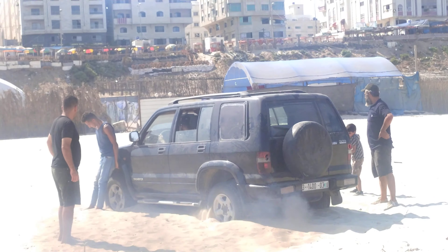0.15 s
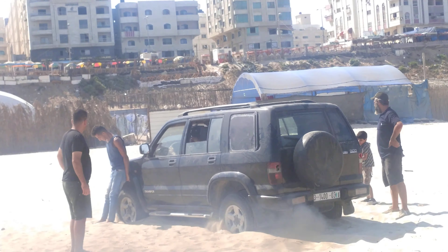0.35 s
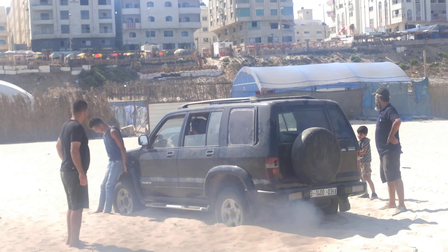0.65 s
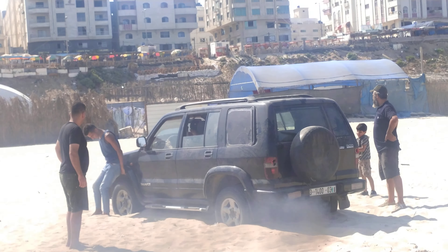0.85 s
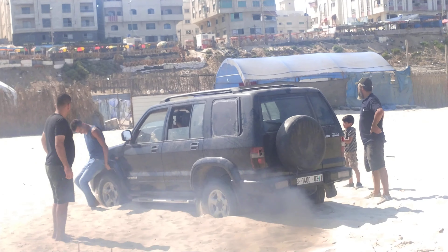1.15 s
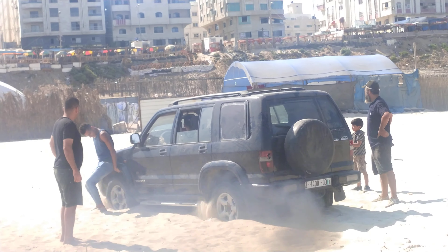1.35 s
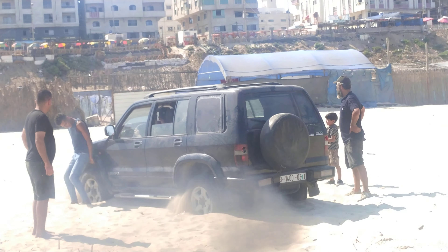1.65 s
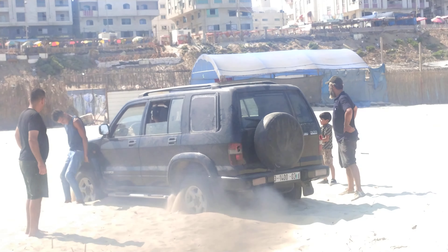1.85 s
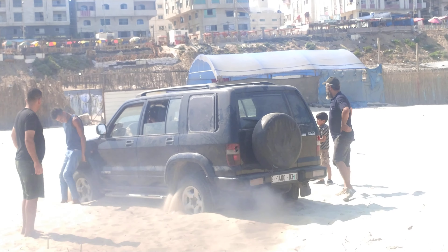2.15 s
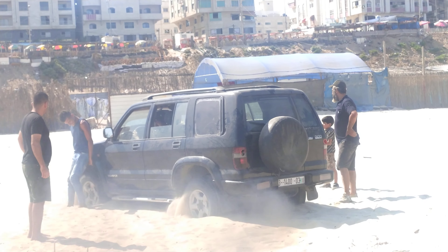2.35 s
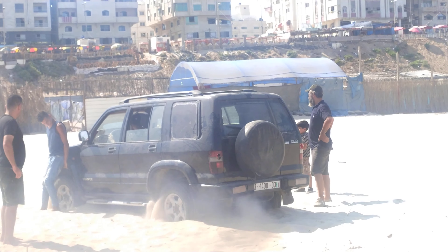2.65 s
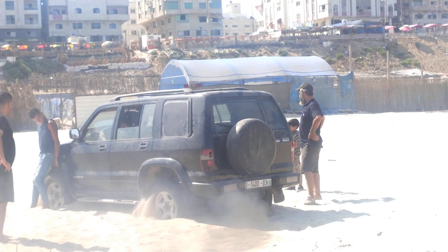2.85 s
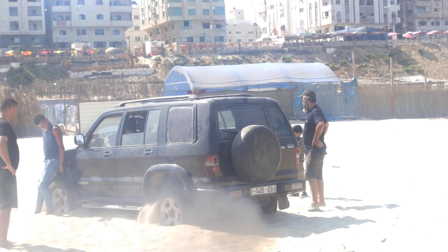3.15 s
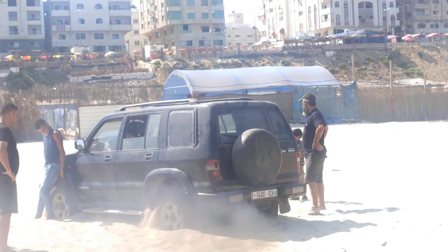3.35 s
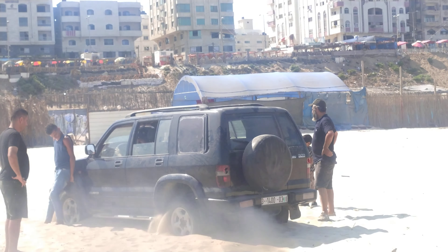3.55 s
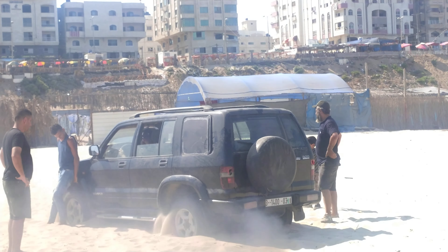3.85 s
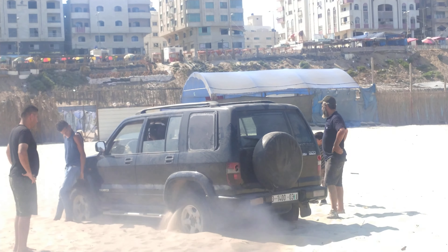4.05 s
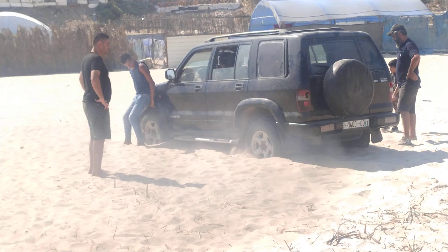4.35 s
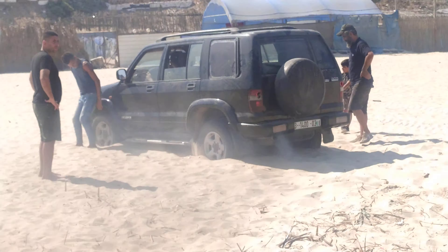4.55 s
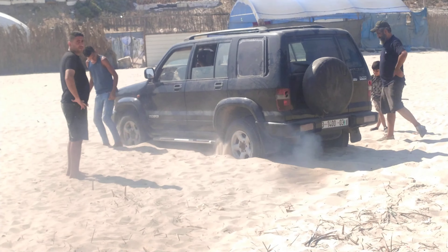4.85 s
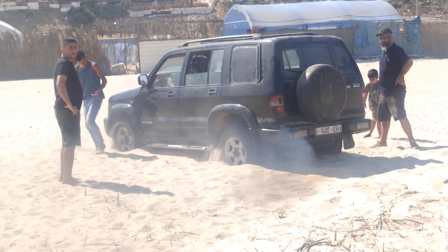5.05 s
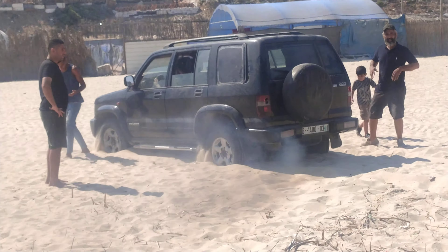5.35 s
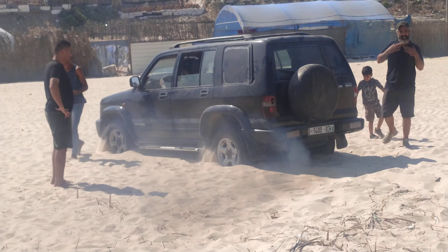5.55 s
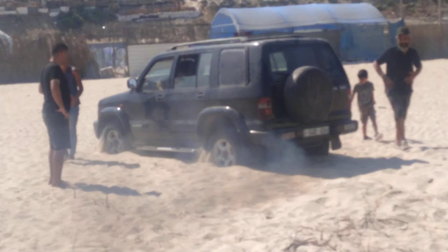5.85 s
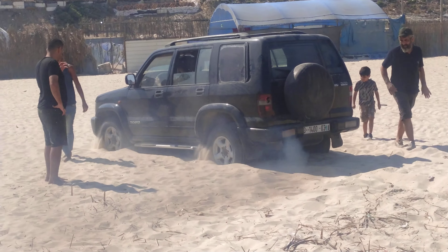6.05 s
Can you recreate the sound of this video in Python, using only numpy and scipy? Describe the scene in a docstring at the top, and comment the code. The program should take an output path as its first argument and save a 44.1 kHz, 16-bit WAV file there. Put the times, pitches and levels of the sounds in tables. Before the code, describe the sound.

Outdoors on a beach, wind rumbles and thumps against the microphone, mainly from the right. Through it, an off-roader's engine climbs in pitch and strains steadily, with a low exhaust drone, fan roar and light metal rattle, as sand hisses off a spinning tyre. After about four seconds the engine settles to lower revs and keeps running, while the gusts hit hardest.

```python
"""Off-roader stuck on a beach

A four-cylinder engine revs up, spins a wheel in soft sand and eases off. Its firings drive an exhaust
drone and the clatter of block and covers, joined by a roaring fan and a thin gear whine. Thrown sand
hisses and ticks, and gusts of wind buffet the microphone, mostly its right port."""
import sys
import numpy as np
from scipy import signal
from scipy.fft import rfft, irfft
from scipy.io import wavfile
from scipy.ndimage import uniform_filter1d

SR = 44100
rng = np.random.default_rng(int(sys.argv[2]) if len(sys.argv) > 2 else 0)


def log_audio(samples):
    """Write samples as a 16-bit WAV file to the path given in sys.argv[1]."""
    # one column per channel
    frames = np.atleast_2d(samples).T
    # limit to full scale, then quantise
    limited = np.clip(frames, -1, 1)
    pcm = np.round(limited * 32767).astype(np.int16)
    wavfile.write(sys.argv[1], SR, pcm)


N = 272979
TIME, FREQ = np.arange(N) / SR, np.fft.rfftfreq(N, 1 / SR)


def amp(db):
    """Decibels to gain."""
    return 10 ** (np.asarray(db) / 20)


def panned(db, pan_db):
    """Left and right gains, the left pan_db above the right."""
    return amp([[db + pan_db / 2], [db - pan_db / 2]])


def unit_rms(x):
    """Scales to an rms of one."""
    return x / np.sqrt(np.mean(x ** 2) + 1e-20)


def curve(rows):
    """A control, joined by straight lines in time."""
    return np.interp(TIME, *np.transpose(rows))


def spectrum(points):
    """A spectrum, joined by straight lines on a log-frequency axis."""
    hz, value = np.transpose(points)
    return np.interp(np.log(FREQ + 1), np.log(hz), value)


def coloured(x, points):
    """Shapes x with an EQ curve and scales it to an rms of one."""
    return unit_rms(irfft(rfft(x) * amp(spectrum(points)), N))


def wander(rate_hz, count=1):
    """Rows of smooth random drift with an rms of one."""
    noise = rfft(rng.standard_normal((count, N)))
    return unit_rms(irfft(noise * np.exp(-(FREQ / rate_hz) ** 2), N))


def envelope(peak_s, hold_s, attack_s, release_s):
    """Grows exponentially to one at peak_s, holds, then dies away."""
    early, late = np.maximum(peak_s - TIME, 0), np.maximum(TIME - peak_s - hold_s, 0)
    return np.exp(-np.minimum(early / attack_s + late / release_s, 30))


def load_at(firing_hz, eased_hz=70, revved_hz=94):
    """Engine load at a firing rate: 0 eased off, 1 revved."""
    return np.clip((firing_hz - eased_hz) / (revved_hz - eased_hz), 0, 1)


def by_load(load, eased, revved):
    """Crossfades a setting from its eased-off to its revved value."""
    return eased + (revved - eased) * load


def build_up(load, rise_s):
    """Creeps up behind the load, but drops with it at once."""
    keep = np.exp(-1 / (rise_s * SR))
    return np.minimum(load, signal.lfilter([1 - keep], [1, -keep], load))


def port_rolloff(hz):
    """Gain of the microphone port, which loses the very top."""
    return 1 / np.sqrt(1 + (hz / 10500) ** 34)


def stereo(x):
    """Blends two unrelated signals so that the ports agree in the bass and less in the treble."""
    # Likeness of the car's sound at the two ports. Each row: frequency in Hz, likeness from 0 to 1.
    likeness = [(50, 0.9), (300, 1), (650, 1), (1400, 0.96), (2500, 0), (4000, 0.49), (7000, 0),
                (15000, 0.3)]
    same = np.clip(spectrum(likeness), 0, 1)
    left, other = rfft(x)
    return irfft(np.array([left, same * left + np.sqrt(1 - same ** 2) * other]), N)


def narrowed(x, spread, lag_s):
    """Draws a wide sound together into one small source, heard later at the left port."""
    left, right = x.mean(0) + spread * (x - x.mean(0))
    return unit_rms(np.array([np.interp(TIME - lag_s, TIME, left), right]))


def add(mix, start_s, sound):
    """Mixes a sound in at start_s."""
    part = mix[..., max(round(start_s * SR), 0):][..., :sound.shape[-1]]
    part += sound[..., :part.shape[-1]]


def bursts(rows, decay_s, gain_db=0):
    """Dry, dying bursts of noise, each in a band round its pitch."""
    out, t = np.zeros((2, N)), np.arange(-256, 8192) / SR
    freq = np.fft.rfftfreq(len(t), 1 / SR) + 1
    for start_s, db, hz, pan_db, width in rows:
        noise = rng.standard_normal(len(t)) * np.exp(-abs(t) / decay_s) * (t >= 0)
        band = np.exp(-.5 * (np.log(freq / hz) / width) ** 2) * port_rolloff(freq)
        hit = irfft(rfft(noise) * band)
        add(out, start_s + t[0], hit / abs(hit).max() * panned(db + gain_db, pan_db))
    return out


def buffeting(port, breeze, flutter_db=2.1, calm_db=-36, hard_db=-17, lumpy_db=2):
    """Turbulence at one port: a fluttering breeze and sudden gusts, brighter the harder it blows."""
    # Gusts. Each row: arrival in seconds, hold in seconds, level in dB, rumble from 0 to 1, port struck.
    gusts = [(0.042, 0.028, -22, 0.36, "right"), (1.12, 0.012, -19, 0.3, "right"),
             (1.83, 0.008, -20.5, 0, "left"), (1.996, 0.045, -14, 0, "right"),
             (2.07, 0.069, -17.5, 0.3, "right"), (2.585, 0.02, -19.5, 0.46, "right"),
             (2.858, 0.077, -21, 0.68, "right"), (3.217, 0.0045, -12.5, 0.28, "right"),
             (3.476, 0.013, -17.5, 0.2, "right"), (3.629, 0.045, -14.5, 0.4, "right"),
             (3.715, 0.021, -15.5, 0.48, "right"), (3.77, 0.28, -21, 0.25, "right"),
             (4.055, 0.024, -15.5, 0.6, "right"), (4.51, 0.11, -21, 0.9, "right"),
             (4.673, 0.08, -18, 0.39, "right"), (4.796, 0.032, -16.5, 0.82, "right"),
             (4.86, 0.016, -16, 0.34, "right"), (4.907, 0.012, -14, 0.5, "right"),
             (4.989, 0.011, -21, 0.37, "right"), (5.117, 0.036, -16.5, 0.49, "right"),
             (5.201, 0.026, -21, 0.67, "right"), (5.611, 0.02, -22, 0, "left"),
             (5.688, 0.041, -18.5, 0.37, "right")]
    # Tone of a breeze and of a hard gust. Each row: frequency in Hz, relative level in dB.
    breeze_eq = [(10, 19.5), (28, 10), (60, 11), (140, 5), (220, 2.5), (350, -25), (600, -21),
                 (1200, -37.5), (3000, -79)]
    gale_eq = [(10, 12.5), (30, -17), (80, -8), (170, 4), (300, 2.5), (450, -4.5), (700, -16), (900, -22),
               (1200, -26.5), (2000, -55), (4000, -85)]
    level = amp(curve(breeze) + flutter_db * wander(11)[0])
    rumble = np.zeros(N)
    for peak_s, hold_s, db, share, struck in gusts:
        if struck == port:
            gust = envelope(peak_s, hold_s, attack_s=0.024, release_s=0.017)
            level = np.maximum(level, amp(db) * gust)
            rumble = np.maximum(rumble, share * gust)
    force = np.clip((20 * np.log10(level) - calm_db) / (hard_db - calm_db), 0, 1)
    brightness = force * (1 - np.minimum(rumble, 1))
    eddies = rng.standard_normal(N) * amp(lumpy_db * wander(107)[0])
    buffet = (1 - brightness) * coloured(eddies, breeze_eq) + brightness * coloured(eddies, gale_eq)
    running_rms = np.sqrt(uniform_filter1d(buffet ** 2, 2600))
    return level * buffet / running_rms


def eddy_slaps(trim_db=-1):
    """An eddy pushes on the port and sucks back: one smooth swing of pressure."""
    # Single eddies. Each row: time in seconds, peak in dB before the trim, centre in Hz.
    slaps = [(1.128, -8.5, 164), (2.007, -4.5, 318), (2.128, -5.5, 362), (2.593, -26, 260),
             (3.712, -7.5, 316), (3.998, -15.5, 428), (4.67, -10, 298), (4.677, -10.5, 376),
             (4.721, -16.5, 330), (4.817, -4, 180), (4.853, -7, 221), (4.8629, -7, 238), (4.8703, -6, 258),
             (4.876, -14, 370), (4.9046, -3, 280), (4.9048, -10.5, 660), (4.9115, -8.5, 480),
             (4.922, -9, 240), (5.713, -20, 151)]
    out = np.zeros(N)
    for at_s, db, hz in slaps:
        angle = 2 * np.pi * hz * (TIME - at_s)
        swing = angle * np.exp(-.5 * np.minimum(angle ** 2, 100))
        out -= amp(db + trim_db) * swing / swing.max()
    return out


def wind():
    """Wind strikes each port on its own; the hardest slap on the right tears into a turbulent wake."""
    # Breeze at the sheltered left and exposed right port. Each row: time in seconds, level in dB.
    breeze_left = [(0, -43), (1.55, -53), (1.75, -32), (1.9, -30), (2.15, -38), (2.35, -54), (3.7, -47),
                   (5.4, -38), (5.65, -31.5), (5.9, -49), (6.19, -36)]
    breeze_right = [(0, -31.5), (.38, -28), (.6, -44), (1.0, -37), (1.65, -28), (1.88, -33), (2.1, -30),
                    (2.35, -41), (2.55, -24.5), (3.2, -32), (3.36, -32.5), (3.55, -25.5), (3.9, -29.5),
                    (6.19, -32.5)]
    # The wake. Each row: start in seconds, mid peak in dB, left over right in dB, pitch-relative width,
    # with the pitch in Hz in third place.
    wakes = [(4.907, -28, 980, -30, 0.33)]
    wake = bursts(wakes, decay_s=0.008)
    left = buffeting("left", breeze_left)
    right = buffeting("right", breeze_right) + eddy_slaps()
    return np.array([left, right]) + wake


def scuffs():
    """Rough swells of noise, each in its own band, as the car shifts in its rut; the long narrow one at 4.15 s
    is a cover rattling."""
    # Scrapes. Each row: start in seconds, level in dB, length in seconds, centre in Hz,
    # width in octaves, left over right in dB.
    scrapes = [(0.0, -45.5, 0.31, 1870, 0.3, 6), (0.773, -41.5, 0.055, 1130, 0.19, 0),
               (1.81, -52, 0.085, 6500, 0.95, -1), (4.15, -59, 0.76, 2820, 0.045, -7),
               (4.224, -45.5, 0.068, 1250, 0.72, -12), (4.226, -51.5, 0.061, 8600, 0.54, -1),
               (4.257, -48, 0.0095, 9900, 0.16, 4), (4.313, -49, 0.019, 9300, 0.34, 1)]
    out, noise = np.zeros((2, N)), rfft(stereo(rng.standard_normal((2, N))))
    for start_s, db, length_s, hz, octaves, pan_db in scrapes:
        band = np.exp(-.5 * (np.log2((FREQ + 1) / hz) / octaves) ** 2) * port_rolloff(FREQ)
        progress = np.clip((TIME - start_s) / length_s, 0, 1)
        swell = np.sqrt(abs(np.sin(np.pi * progress)))
        out += unit_rms(irfft(noise * band, N)) * swell * panned(db, pan_db)
    return out


def impacts():
    """Sharp ticks of grit and dull knocks from the car."""
    # Ticks and knocks. Each row: start in seconds, relative peak in dB, pitch in Hz,
    # left over right in dB, bandwidth relative to the pitch.
    ticks = [(0.3336, -35, 9040, 11, 0.27), (0.6854, -33, 9320, 0.5, 0.5), (1.001, -33.5, 8500, 0, 0.76),
             (1.1948, -18.5, 7400, 8, 0.3), (1.823, -36.5, 8500, 8, .22), (1.8504, -33, 7800, 13, 0.2),
             (1.872, -36, 9000, 8, .2), (2.2337, -31, 10300, 2.5, 0.14), (2.3762, -31.5, 9300, 0.5, 0.16),
             (3.292, -33, 9440, -0.5, 0.15), (5.785, -39, 9000, 0, 0.2)]
    knocks = [(.788, -28, 1000, -2, 0.25), (1.438, -24, 840, 3, 0.48), (4.238, -26.5, 950, -1, 0.16)]
    return bursts(ticks, decay_s=0.0007) + bursts(knocks, decay_s=0.008, gain_db=-4.5)


def grain_stream(eq, grain_db=0.5, flutter_db=0.7, grains_per_s=9000):
    """A stream of tiny grain impacts of uneven size, thrown in clumps."""
    sizes = amp(grain_db * np.minimum(rng.exponential(1, (2, N)), 5)) * rng.standard_normal((2, N))
    grains = sizes * (rng.random((2, N)) < grains_per_s / SR)
    return coloured(stereo(grains), eq) * amp(flutter_db * wander(22))


def thrown_sand(load):
    """The tyre breaks loose in a broad spray; as it digs in, the hiss grows and coarse grit flies."""
    # Tone of the grit, the hiss and the spray. Each row: frequency in Hz, relative level in dB.
    coarse_eq = [(3000, -38), (4300, -12), (4800, 3), (5600, 4), (6100, -19), (8000, -40)]
    hiss_eq = [(2000, 1), (3500, 5.5), (3950, 5.5), (4550, -1), (5400, -2), (6000, -5), (6500, 1.5),
               (7100, -1.5), (8400, 4), (9200, 8), (10200, 0.5), (11000, -6), (12200, -22), (12900, -15),
               (14000, -20), (15500, -38)]
    spray_eq = [(1500, -2.5), (3300, -5.5), (3950, -6), (4450, -6), (5400, -3), (6100, -6), (7000, -4.5),
                (8000, -5), (9400, -2.5), (10200, -1.5), (11100, -8.5), (12000, -7.5), (14100, -14),
                (14900, -34)]
    slip = build_up(load ** 2.8, rise_s=0.15)
    coarse = grain_stream(coarse_eq, grain_db=4.0, flutter_db=3.1) * amp(-60.5) * slip
    hiss = grain_stream(hiss_eq) * amp(by_load(slip, eased=-51.5, revved=-48.5))
    breakaway = envelope(peak_s=0.69, hold_s=0.049, attack_s=0.68, release_s=0.12)
    spray = grain_stream(spray_eq) * amp(-42.5) * breakaway
    return hiss + coarse + spray


def gear_whine(firings, waver_db=2):
    """The timing gear meshes 25 times a firing; backlash roughens its tone."""
    # Swells of the whine. Each row: time in seconds, level in dB.
    swells = [(0, -70), (.8, -68), (.95, -56.5), (1.3, -58), (1.5, -67), (2.75, -66), (3.0, -58),
              (3.58, -57), (3.85, -70), (4.15, -66), (4.55, -55.5), (5.0, -57), (5.25, -61.5), (6.19, -62)]
    mesh = np.sqrt(2) * np.sin(2 * np.pi * 25 * firings + .6 * wander(50))
    return mesh * amp(curve(swells) + waver_db * wander(5.2))


def clatter(firings, eq, ring_s, knock_share, lope, uneven_db, cylinders=4):
    """Each cylinder knocks the metal with its own ring; a rattle of noise lopes once per engine cycle."""
    fired = np.flatnonzero(np.diff(np.floor(firings)))
    t = np.arange(4096) / SR
    knocks = np.zeros((2, N))
    for cylinder in range(cylinders):
        blows, at = np.zeros((1, N)), fired[cylinder::cylinders]
        blows[0, at] = amp(uneven_db * rng.standard_normal(len(at)))
        ring = rng.standard_normal((2, len(t))) * np.exp(-t / ring_s)
        knocks += signal.oaconvolve(blows, ring, axes=1)[:, :N]
    pulse = 1 + lope * np.exp(-cylinders * (firings / cylinders % 1))
    rattle = rng.standard_normal((2, N)) * pulse * amp(uneven_db * wander(67)[0])
    blend = np.sqrt(knock_share) * unit_rms(knocks) + np.sqrt(1 - knock_share) * unit_rms(rattle)
    return coloured(stereo(blend), eq)


def loose_cover(ring_hz=2590, stray_hz=45, width_hz=110):
    """A rough, fuzzy ring whose pitch strays as the cover shifts."""
    angle = 2 * np.pi * np.cumsum(ring_hz + stray_hz * wander(5.0)[0]) / SR
    fuzz = wander(width_hz, count=2)
    return fuzz[0] * np.cos(angle) + fuzz[1] * np.sin(angle)


def cover_rattle(firings, rasp_s=0.035):
    """Thin metal covers rattle with the firings, and a loose one buzzes among them."""
    # Ring of the covers. Each row: frequency in Hz, relative level in dB.
    cover_eq = [(1300, -11.5), (2200, -5), (2420, 6.5), (2560, 2.5), (2690, 0), (2820, -3.5), (3050, -5),
                (3500, -25), (3950, -9.5), (4500, -45), (8000, -42)]
    # The rattle dips as the revs fall and again near the end. Each row: time in seconds, level in dB.
    levels = [(0, -59.5), (.4, -48.5), (3.5, -47.5), (3.95, -55.5), (4.35, -50.5), (4.8, -47), (5.15, -60),
              (6.19, -54)]
    # Brief harder rasps. Each row: time in seconds, boost in dB.
    rasps = [(.68, 1), (1.0, 4), (1.6, 5), (2.03, 1.5), (3.06, 3), (4.27, 6)]
    rattle = clatter(firings, cover_eq, ring_s=0.028, knock_share=0.63, lope=0.44, uneven_db=2.5)
    covers = narrowed(rattle + amp(-8.5) * loose_cover(), spread=0.26, lag_s=0.00035)
    rasp_db = sum(db * np.exp(-((TIME - at_s) / rasp_s) ** 2) for at_s, db in rasps)
    return covers * amp(curve(levels) + rasp_db)


def block_clatter(firings, load):
    """Combustion knocks ring through the engine block."""
    # Ring of the block. Each row: frequency in Hz, relative level in dB.
    block_eq = [(400, 2), (760, -12.5), (860, 1), (960, 0), (1200, -0.5), (1310, -7.5), (1420, -5.5),
                (1530, -6), (1720, -5), (1880, -8), (2030, -10.5), (2600, -10), (3500, -24.5), (5000, -22),
                (8000, -58)]
    block = clatter(firings, block_eq, ring_s=0.033, knock_share=0.36, lope=0.34, uneven_db=1.04)
    return block * amp(by_load(load, eased=-41.5, revved=-41))


def block_singing(firings, load, waver_db=4.0, jitter_rad=0.3):
    """The straining block sings upper partials that waver in strength and phase; the steady line at 10.33 times
    the firing rate is the tone of an accessory such as the alternator or pump."""
    # Partials. Each row: multiple of the firing rate, relative level in dB eased off, then revved.
    partials = [(9, -80, -59.5), (9.5, -80, -59), (10, -80, -62), (10.33, -78, -56), (11, -76, -60.5),
                (11.5, -72, -62), (12, -67, -60), (12.5, -66, -63), (12.75, -67, -61.5), (13, -59.5, -63),
                (13.5, -59.5, -67), (14, -64, -66), (15, -67, -65), (16, -64, -68), (17.75, -63, -70),
                (18, -62, -68)]
    out = np.zeros(N)
    for multiple, eased_db, revved_db in partials:
        swell, drift = wander(10.5, count=2)
        level_db = by_load(load, eased_db, revved_db) + waver_db * swell
        out += amp(level_db) * np.cos(2 * np.pi * (multiple * firings + rng.random()) + jitter_rad * drift)
    return out


def fan(firings, load, throb=0.25, waver_db=4.0):
    """The cooling fan: a roar of air that throbs with the firings, and wavering blade tones."""
    # The fan trails the engine on its slipping clutch.
    # Each row: time in seconds, blade rate in Hz, boost of the tones in dB.
    speeds = [(0, 405, -3), (.35, 388, -4), (.5, 402, 0), (.72, 455, -1), (.8, 463, -1), (.92, 443, -3),
              (1.15, 424, -1), (2.6, 429, -1), (3.65, 428, -1), (3.9, 411, 4), (4.1, 383, -3),
              (4.27, 369, 4), (4.55, 363, -1), (6.19, 362, 0)]
    # Blade tones. Each row: multiple of the blade rate, relative level in dB.
    blade_tones = [(.895, -69), (1, -45), (1.066, -49.5)]
    # Roar of fan and exhaust. Each row: frequency in Hz, relative level in dB.
    roar_eq = [(20, -20), (60, 2.5), (120, -14.5), (180, 7), (235, 5.5), (335, 0.5), (430, 5.5), (465, -3),
               (535, -7.5), (615, -14.5), (760, -43), (1100, -52)]
    blade_hz, boost_db = (curve(np.array(speeds)[:, [0, k]]) for k in (1, 2))
    air = coloured(stereo(rng.standard_normal((2, N))), roar_eq)
    playhead = np.cumsum(blade_hz / blade_hz.max())  # the roar darkens as the fan slows
    air = np.array([np.interp(playhead, np.arange(N), port) for port in air])
    roar = unit_rms(air * (1 + throb * np.cos(2 * np.pi * firings)))
    out = roar * amp(by_load(load, eased=-38.0, revved=-33.5))
    angle = 2 * np.pi * np.cumsum(blade_hz) / SR
    for multiple, db in blade_tones:
        level = amp(db + boost_db + waver_db * wander(35))
        out += level * np.sqrt(2) * np.sin(multiple * angle + 0.15 * wander(1.8))
    return out


def exhaust(firings, pull):
    """Firing harmonics drone; unequal cylinders add quarter orders under load."""
    # Drone partials. Each row: multiple of the firing rate, relative level in dB eased off,
    # then revved, seconds to take up the strain.
    orders = [(1, -38.5, -40.3, .1), (1.5, -57, -41.5, .02), (1.75, -62, -45, .4), (2, -46, -34, .5),
              (2.5, -57, -48, .05), (3, -47, -37, .02), (3.25, -60, -50, .2), (3.75, -57, -48, .1),
              (4, -54, -42, .2), (4.25, -60, -46.5, .2), (4.5, -54, -50, .1), (5, -55, -53, .2),
              (6, -56, -58, .2), (6.25, -64, -59.5, .2)]
    out = np.zeros(N)
    for multiple, eased_db, revved_db, strain_s in orders:
        level_db = by_load(build_up(pull, strain_s), eased_db, revved_db)
        out += amp(level_db) * np.sqrt(2) * np.cos(2 * np.pi * (multiple * firings + rng.random()))
    return out


def pedal(firing_hz, lead_s=0.12):
    """Pull of the engine from 0 to 1, running just ahead of the revs."""
    climb_hz_per_s = SR * np.gradient(uniform_filter1d(firing_hz, size=6000))
    return load_at(firing_hz + lead_s * climb_hz_per_s)


def firing_rate():
    """The revs flare, settle on the spinning wheel and ease off, always wavering slightly."""
    # Engine speed. Each row: time in seconds, firings per second.
    revs = [(0, 65.7), (.21, 66), (.43, 80.9), (.72, 100), (.92, 93.2), (1.2, 92), (2.8, 94.5), (3.6, 94.3),
            (3.79, 91.3), (3.98, 80), (4.15, 74), (4.27, 71), (4.55, 70.3), (5.95, 69.4), (6.19, 71)]
    return uniform_filter1d(curve(revs), 3000) * (1 + .002 * wander(10)[0])


def engine(firing_hz, load):
    """One crankshaft times the drone, the fan's throb, the clatter and the timing gear."""
    # Effort, which lifts drone, fan and block. Each row: time in seconds, gain in dB.
    throttle = [(0, -1.5), (.35, -1.5), (1, 0), (3.6, 0), (6.19, 0.36)]
    firings = np.cumsum(firing_hz) / SR  # running count
    body = exhaust(firings, pedal(firing_hz)) + fan(firings, load)
    body += block_singing(firings, load) + block_clatter(firings, load)
    return body * amp(curve(throttle)) + cover_rattle(firings) + gear_whine(firings)


def placed(car, left_lag_s=.0001):
    """The car stands a little to the right, so its sound reaches the left port later."""
    # Stereo balance. Each row: frequency in Hz, left over right in dB.
    balance = [(100, -1.5), (500, 0.5), (1000, -1.5), (1700, 1), (2500, 5), (4000, 1.5), (9000, 1),
               (13000, -1.5)]
    tilt_db = spectrum(balance) / 2
    delay = np.exp(-2j * np.pi * FREQ * left_lag_s)
    return irfft(rfft(car) * np.array([amp(tilt_db) * delay, amp(-tilt_db)]), N)


def scene():
    """The revs drive both engine and sand, while wind buffets the microphone."""
    firing_hz = firing_rate()
    load = load_at(firing_hz)
    car = thrown_sand(load) + engine(firing_hz, load) + scuffs()
    return placed(car) + impacts() + wind()


def record(dry):
    """The microphone's low cut, its full-scale limit, then the band limit."""
    low_cut = signal.butter(2, 14, "high", fs=SR, output="sos")
    clipped = np.clip(signal.sosfilt(low_cut, dry), -1, 1)
    lowpass = signal.firwin(511, 15400, window=("kaiser", 9), fs=SR)
    return signal.oaconvolve(clipped, lowpass[None], "same", axes=1)


dry = scene()
out = record(dry)
log_audio(out)
```